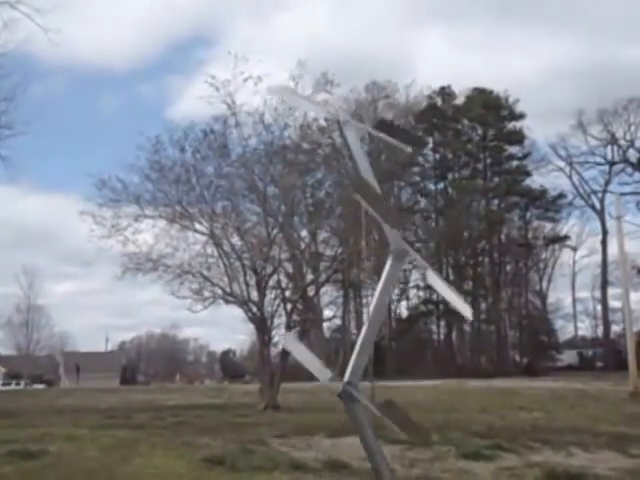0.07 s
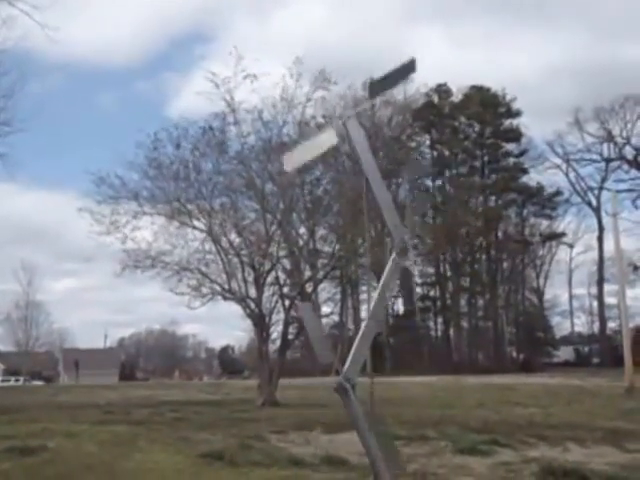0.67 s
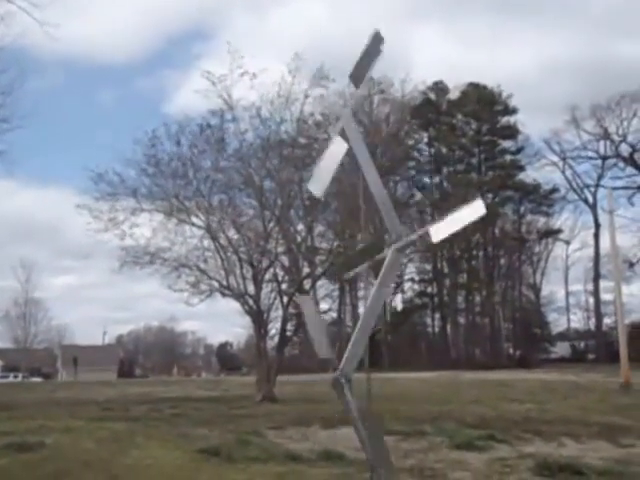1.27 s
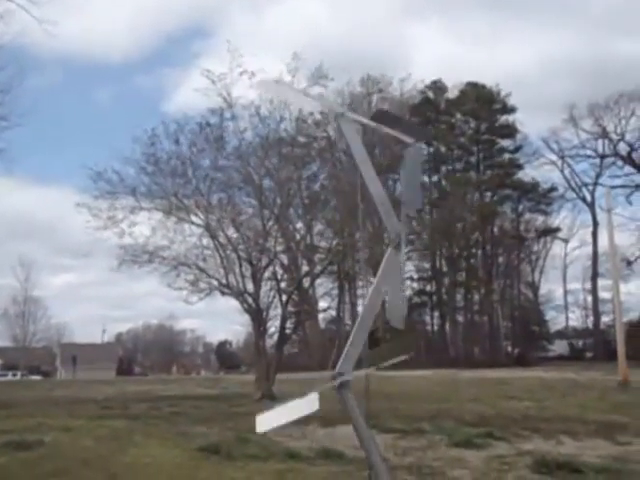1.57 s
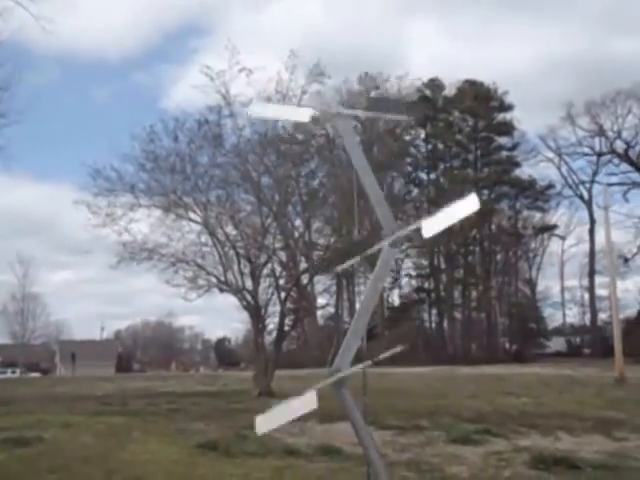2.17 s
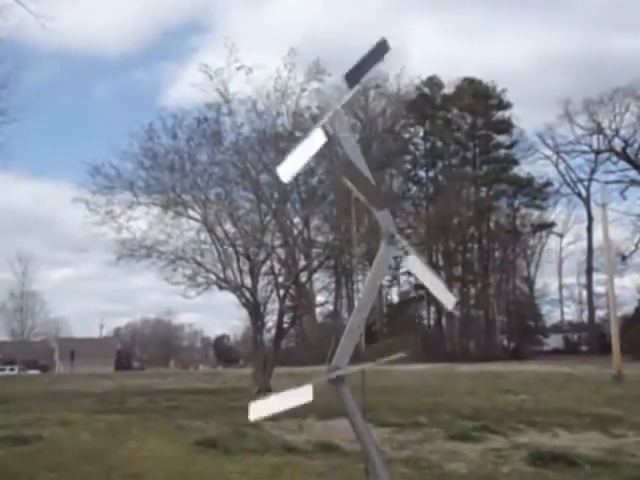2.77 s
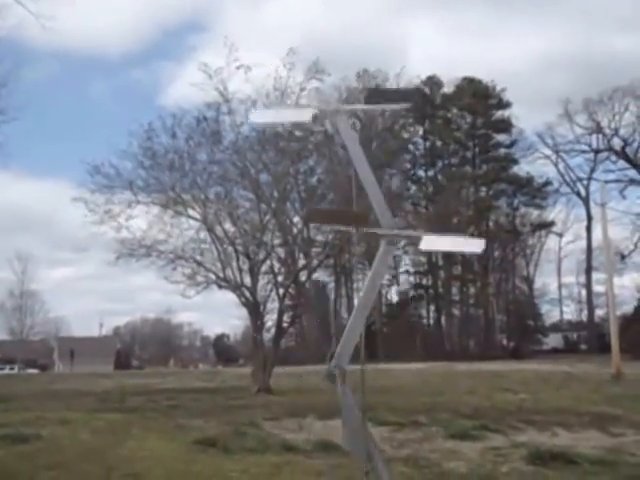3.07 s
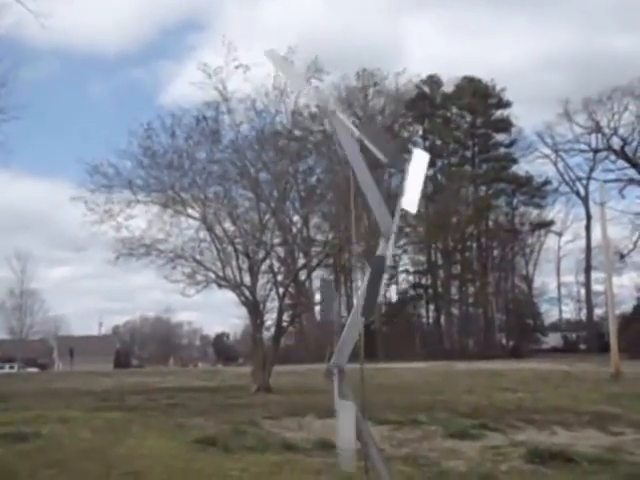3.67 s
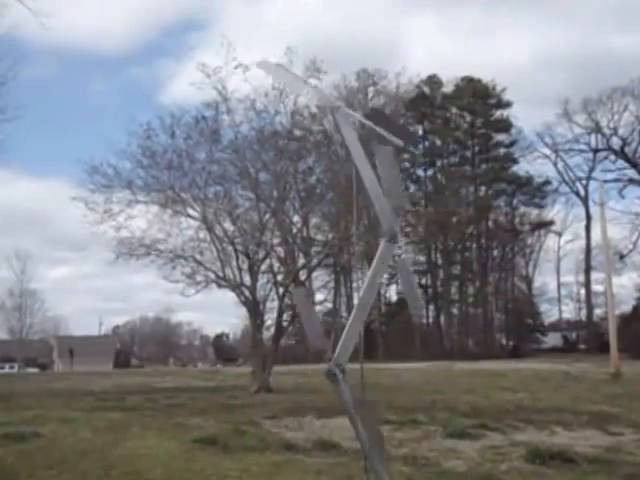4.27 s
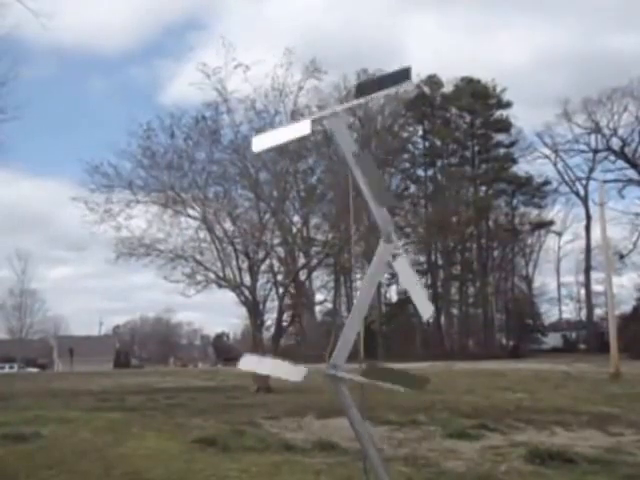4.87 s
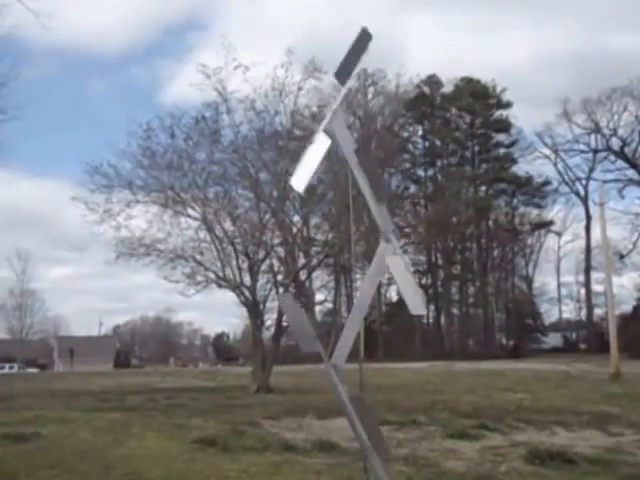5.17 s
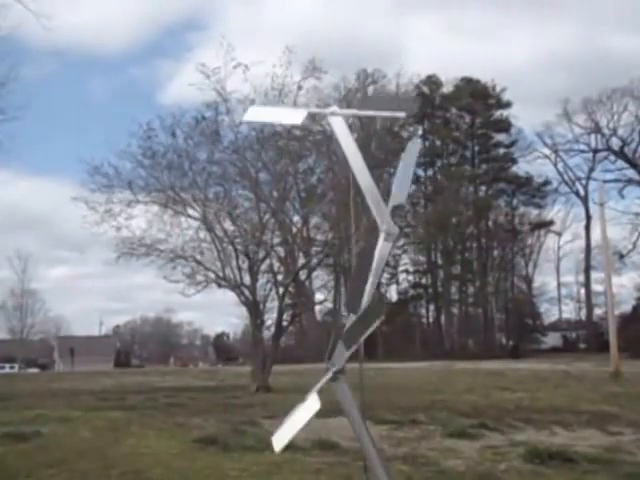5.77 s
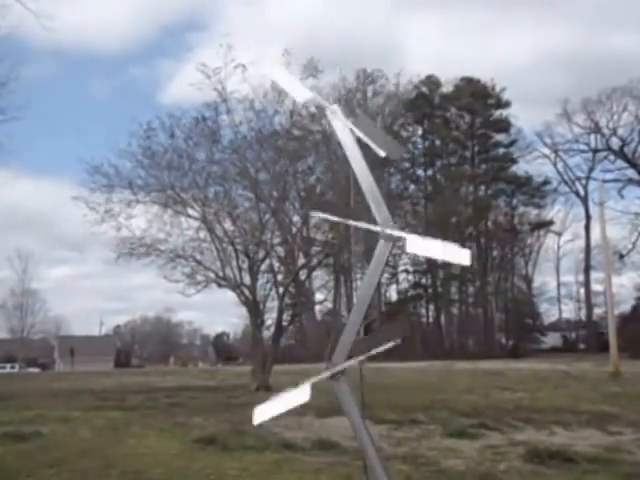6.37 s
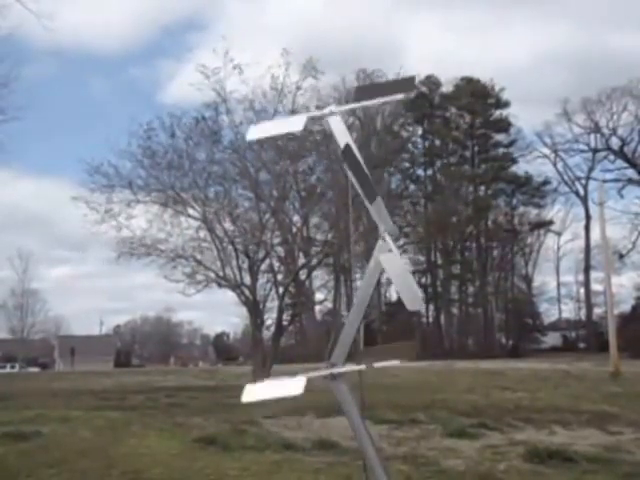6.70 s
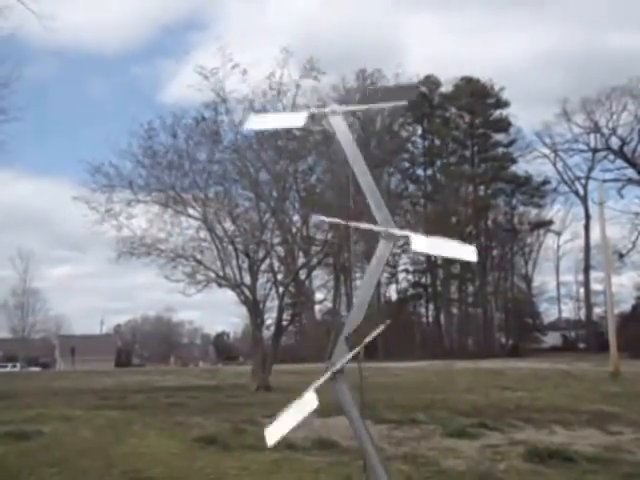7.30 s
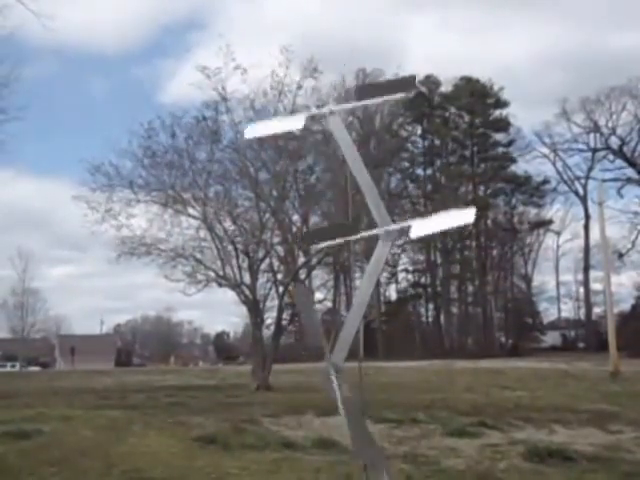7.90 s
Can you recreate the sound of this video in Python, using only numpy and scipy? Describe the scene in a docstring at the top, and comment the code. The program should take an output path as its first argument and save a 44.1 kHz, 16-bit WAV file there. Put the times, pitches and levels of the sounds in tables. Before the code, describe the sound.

A metal wind sculpture rattles, clicks and squeaks as its vanes turn, while gusts rumble on the microphone.

```python
"""A metal kinetic windmill with three vanes turns in a gusty yard, a few metres from a small camera.
With each swing loose balls run and tumble in its dry bearings, knock on the hub, ring the hollow arms
and now and then chatter into short stick-slip squeals. Wind eddies rumble, flutter and thump on the
microphone, over faint air and hum. The camera keeps only a narrow band."""
import sys
import numpy as np
from scipy import signal
from scipy.fft import rfft, irfft, next_fast_len
from scipy.io import wavfile
from scipy.ndimage import uniform_filter1d

SR = 44100
rng = np.random.default_rng(int(sys.argv[2]) if len(sys.argv) > 2 else 0)


def put_to_file(sound):
    """Save the sound as 16-bit audio at rate SR, in the file named by the first command-line argument."""
    columns = np.atleast_2d(sound).T  # one column per channel
    safe = np.clip(columns, -1, 1)
    whole_steps = np.round(safe * 32767)
    wavfile.write(sys.argv[1], SR, whole_steps.astype(np.int16))


N = 350154
T = np.arange(N) / SR

# Levels are relative within each table.
# still air: f/Hz, level/dB
AIR_SPECTRUM = [(30, -10.5), (150, -20.5), (250, -5.5), (500, -5.5), (1000, -7), (5000, -32.5)]
# slow eddies: f/Hz, level/dB
RUMBLE_SPECTRUM = [(10, -3.5), (25, 1.5), (50, -4.5), (80, -9), (120, -17), (200, -33.5), (400, -58)]
# small eddies in a breeze: f/Hz, level/dB
BREEZE_SPECTRUM = [(40, -13), (90, 6.5), (150, 1.5), (250, -8), (400, -30.5), (700, -49)]
# small eddies in a gust: f/Hz, level/dB
GUST_SPECTRUM = [(40, -16), (90, 1), (150, 0), (250, -4.5), (400, -14.5), (700, -23.5), (1500, -52)]
# rumble of the steady wind: t/s, level/dB
STEADY_WIND = [(0, -32), (.7, -31), (1.05, -41.5), (1.25, -33.5), (1.55, -32), (2.1, -45.5), (2.35, -43.5),
               (2.5, -40.5), (2.85, -50.5), (3.2, -39.5), (4.5, -27.5), (4.85, -35.5), (5.7, -27.5),
               (5.97, -39), (6.1, -29.5), (6.7, -32), (7.7, -31), (7.94, -41.5)]
# a brief low bump at the very start, then gusts: t/s, hold/s, rumble/dB, flutter/dB
LOW_SWELLS = [(0, 0.0075, -24, -39), (0.347, 0.019, -26, -37), (0.508, 0.035, -27, -53),
              (0.607, .02, -40, -44), (1.587, 0.028, -25.5, -38), (1.827, 0.018, -33, -37.5),
              (1.91, 0.032, -32, -37), (2.465, 0.12, -36.5, -47), (3.064, 0.017, -30.5, -32.5),
              (3.175, 0.044, -24.5, -34.5), (3.304, 0.094, -23.5, -30.5), (3.568, 0.28, -28, -36.5),
              (3.891, 0.1, -29, -23.5), (4.157, 0.087, -26.5, -24), (4.382, 0.047, -24, -24.5),
              (4.495, 0.089, -30, -33), (5.073, 0.026, -24.5, -46), (5.135, 0.019, -30, -31),
              (5.24, .045, -28, -38.5), (5.53, 0.09, -24, -39.5), (5.647, 0.14, -22.5, -40),
              (5.894, 0.022, -31, -36), (6.091, .025, -30, -38), (6.322, 0.065, -25, -38),
              (6.563, 0.048, -24, -42), (6.684, 0.037, -25, -55), (6.81, 0.019, -32, -40),
              (7.037, .03, -28, -40.5), (7.216, 0.057, -22.5, -41.5), (7.425, 0.069, -26, -39.5),
              (7.569, 0.028, -35, -35), (7.698, .07, -22, -41)]
# vortices hitting the microphone: t/s, half width/s, suction/dB
VORTICES = [(3.256, 0.0018, -16.5), (3.758, 0.0006, -8.5), (3.797, 0.0014, -11.5), (3.835, 0.00075, -8),
            (3.896, 0.0009, -12), (3.926, 0.0007, -19), (4.17, 0.0013, -8.5), (4.216, 0.00068, -24.5),
            (4.41, 0.00079, -19), (4.524, 0.0015, -17), (5.141, 0.00091, -15.5), (5.447, 0.00066, -26),
            (5.67, 0.0008, -4), (5.688, 0.0031, -6.5), (5.814, 0.0011, -17), (6.828, 0.0046, -23),
            (7.218, 0.0035, -11), (7.597, 0.0014, -13), (7.708, 0.00094, -2)]

# bearings turning between runs: t/s, level/dB
BEARING_IDLE = [(0, -37), (.5, -38), (.8, -41), (1.4, -37), (2.1, -39.5), (3.4, -36), (4.15, -41.5),
                (4.6, -39.5), (5.3, -34.5), (5.8, -41.5), (6.3, -35.5), (6.95, -47), (7.15, -47),
                (7.5, -41.5), (7.9, -46)]
# balls speed down a race as a vane swings over, then settle: crest t/s, rise/s, fall/s, level/dB, treble/dB
BALL_RUNS = [(.11, 0.023, 0.054, -35, 16.5), (0.431, 0.08, 0.16, -36, 10), (.66, 0.051, 0.043, -28.5, 5.5),
             (.92, 0.027, 0.053, -25.5, 4.5), (1.149, .025, 0.091, -29.5, 4), (1.41, 0.057, .035, -25.5, 7),
             (1.485, .02, .04, -32.5, 9.5), (1.635, 0.016, 0.026, -24, 7), (1.719, .02, 0.035, -33.5, -3),
             (1.892, 0.022, 0.046, -26.5, 11), (2.08, 0.028, .07, -32.5, -5.5),
             (2.23, .015, 0.059, -32, -2.5), (2.365, .03, .04, -25, 6), (2.735, 0.1, 0.049, -29, 5),
             (2.897, 0.031, 0.022, -23.5, 0), (3.071, 0.014, 0.02, -34.5, -3),
             (3.198, 0.028, .18, -31.5, 6.5), (3.451, 0.064, 0.039, -26, 5.5),
             (3.539, 0.02, .03, -34.5, 12), (3.715, 0.036, .08, -23, 8), (3.97, 0.037, 0.035, -29, 3.5),
             (4.078, 0.024, .02, -28, 4.5), (4.221, 0.011, .025, -34.5, 5), (4.34, 0.058, 0.13, -31, 11.5),
             (4.5, 0.045, .08, -28.5, 2.5), (4.665, .035, 0.031, -24.5, 7.5), (4.8, .025, .035, -29.5, 1.5),
             (4.915, 0.013, .11, -34, 12), (5.15, 0.036, 0.017, -25, 3.5), (5.32, 0.036, 0.044, -31, 6),
             (5.469, 0.055, 0.08, -25.5, 7), (5.661, 0.025, 0.043, -24, 5.5),
             (5.839, 0.018, 0.042, -26.5, 1), (6.037, 0.022, 0.042, -27, 4),
             (6.22, 0.23, 0.061, -33.5, 8.5), (6.48, 0.26, .04, -34.5, 8.5),
             (6.618, .02, 0.066, -38.5, 13.5), (6.845, .08, 0.062, -26.5, 6), (7.06, 0.029, 0.036, -35, 10),
             (7.22, .035, 0.069, -26.5, 6.5), (7.42, 0.052, .03, -33.5, 2), (7.609, 0.069, 0.058, -29, 5)]
# ball contacts: f/Hz, level/dB
CONTACT_SPECTRUM = [(300, -34.5), (550, -23.5), (800, -7), (1000, -8), (1180, -3), (1350, 1.5),
                    (1550, -7.5), (2100, -0.5), (2700, -1.5), (3200, 1.5), (3600, 2.5), (4500, 6),
                    (5000, 3), (5500, -4.5)]
# balls tumbling in a heap: t/s, length/s, level/dB
TUMBLES = [(0.113, 0.028, -28), (0.502, 0.01, -35), (0.903, 0.022, -41), (1.4, 0.014, -26),
           (1.616, 0.022, -29.5), (1.87, 0.028, -27), (2.355, 0.027, -31), (2.906, 0.024, -23.5),
           (4.636, 0.025, -26.5), (4.753, 0.036, -25), (5.071, 0.052, -29.5), (5.278, 0.037, -27),
           (5.387, 0.009, -24.5), (5.421, 0.014, -25.5), (6.845, 0.013, -28)]
# how hard the balls bear on the arms: t/s, level/dB
ARM_LOAD = [(0, -2.5), (2, 3), (4, 0), (5, 3.5), (5.6, 6), (7, 8), (7.9, 8)]
# modes of the hollow arms: f/Hz, width/Hz, level/dB
ARM_MODES = [(744, 16, 1), (862, 16, -5), (1120, 40, 0), (1205, 50, 3), (1606, 30, 3), (1772, 20, 12),
             (1911, 22, 6), (2321, 36, 8), (2638, 30, 1), (2838, 36, 3), (3035, 40, 3), (3362, 46, 6),
             (3445, 44, 4.5), (3975, 50, 0), (5270, 40, 0)]
# square blows on the hub: t/s, level/dB
HUB_CLANGS = [(.916, -22.5), (1.385, -21), (1.632, -30), (1.874, -23), (2.362, -31), (2.92, -29),
              (5.428, -26), (5.625, -25)]
# single balls dropping on the hub: t/s, level/dB
HUB_KNOCKS = [(0.881, -23), (1.329, -24), (1.549, -25.5), (1.62, -23), (1.753, -23), (1.798, -21.5),
              (1.88, -19.5), (1.946, -20.5), (1.994, -22), (2.225, -20), (2.363, -18), (2.735, -17.5),
              (3.361, -20), (3.43, -17), (3.716, -20), (4.649, -18.5), (4.783, -24), (5.318, -20),
              (5.475, -22), (5.838, -21), (6.179, -20), (6.854, -16.5)]
# squeals and low groans of a slipping bearing: t/s, length/s, f/Hz, nominal width/Hz, level/dB
SQUEALS = [(0.073, 0.017, 3920, 390, -17), (0.115, 0.013, 4800, 445, -18), (0.198, 0.035, 3500, 374, -27.5),
           (.326, 0.019, 4880, 524, -18), (0.339, 0.023, 4000, 700, -22.5),
           (0.496, 0.014, 3960, 59.5, -17.5), (0.554, 0.037, 4630, 290, -24),
           (0.617, 0.13, 4520, 200, -31.5), (0.91, 0.011, 3800, 376, -19), (0.956, .007, 3960, 230, -19),
           (1.37, 0.032, 3700, 443, -25), (1.673, 0.0082, 4730, 80, -16.5), (1.868, .006, 3480, 130, -14),
           (2.311, 0.019, 3790, 280, -23), (2.5, 0.064, 2610, 60, -35), (2.714, 0.083, 5070, 300, -29),
           (2.912, 0.0068, 3510, 60, -18.5), (3.116, 0.02, 4580, 300, -23), (3.221, 0.0063, 4040, 60, -13),
           (3.327, 0.058, 3280, 635, -28.5), (3.497, .014, 3650, 80, -21), (3.502, 0.032, 4560, 111, -23),
           (3.611, .024, 3880, 120, -23.5), (4.06, 0.019, 3600, 322, -23), (4.115, 0.024, 3720, 259, -20),
           (4.157, 0.015, 4290, 250, -22), (4.168, 0.051, 3050, 150, -30), (4.227, 0.021, 4000, 59, -21.5),
           (4.324, 0.0084, 3870, 71, -15), (4.286, 0.022, 4900, 337, -27.5), (4.337, .04, 4500, 380, -22.5),
           (4.402, 0.034, 4365, 111, -16.5), (4.506, 0.15, 2835, 70, -28.5),
           (4.56, 0.074, 5310, 250, -31.5), (4.633, 0.02, 3250, 350, -20), (4.751, 0.0078, 3200, 330, -18),
           (4.84, 0.009, 3950, 180, -19.5), (4.884, 0.011, 3510, 600, -13.5),
           (4.899, 0.054, 4000, 160, -16.5), (5.071, .012, 3570, 500, -26), (5.203, 0.047, 4460, 272, -27),
           (5.279, .015, 3390, 150, -22.5), (5.424, .015, 3390, 60, -20.5), (5.502, .016, 3570, 82, -22),
           (5.581, 0.035, 4400, 150, -22.5), (5.62, 0.026, 3400, 119, -18), (5.765, .062, 2880, 182, -31.5),
           (5.843, .057, 737, 70, -41), (6.016, 0.015, 4330, 101, -21.5), (6.166, 0.11, 724, 60, -44),
           (6.404, 0.028, 703, 60, -41.5), (6.759, 0.08, 740, 70, -48), (6.28, 0.083, 4390, 60, -26),
           (6.516, .056, 2866, 80, -26.5), (6.601, 0.11, 2510, 150, -31.5),
           (6.664, 0.052, 5130, 120, -29.5), (6.831, .037, 3700, 350, -22.5), (6.929, 0.03, 4190, 100, -27),
           (7.012, 0.28, 2610, 100, -34), (7.113, 0.044, 5210, 90, -30), (7.228, 0.08, 3670, 356, -22),
           (7.53, .16, 5260, 150, -36), (7.662, 0.16, 2586, 60, -38), (7.773, 0.1, 3060, 60, -34.5),
           (7.916, .018, 3660, 180, -17)]


def undb(db):
    """Decibels to gain."""
    return 10 ** (np.asarray(db) / 20)


def unit(x):
    """Scale to rms 1."""
    return x / np.sqrt(np.mean(x ** 2))


def curve(table):
    """A (t/s, value) table, sample by sample."""
    return np.interp(T, *np.transpose(table))


def colour(x, spectrum):
    """Filter by an (f/Hz, level/dB) spectrum, to rms 1."""
    size = next_fast_len(N)
    bins_hz = np.maximum(np.fft.rfftfreq(size, 1 / SR), 1)
    hz, db = np.transpose(spectrum)
    gain = undb(np.interp(np.log(bins_hz), np.log(hz), db))
    return unit(irfft(rfft(x, size) * gain, size)[:N])


def ring(x, hz, *widths_hz):
    """One resonator per width, in series; gain 1 at the centre."""
    for width_hz in widths_hz:
        x = signal.lfilter(*signal.iirpeak(hz, hz / width_hz, fs=SR), x)
    return x


def drift(rate_hz):
    """Smooth random drift, spread near 1."""
    step = int(SR / rate_hz)
    stairs = np.repeat(rng.standard_normal(N // step + 1), step)
    return 1.2 * uniform_filter1d(stairs, step)[:N]


def clicks(size, per_s, spread_db):
    """Random impacts of uneven strength, rms 1."""
    struck = rng.random(size) < per_s / SR
    strength = undb(spread_db * np.clip(rng.standard_normal(size), -2, 2))
    sign = rng.choice([-1, 1], size)
    return unit(sign * (struck * strength + 1e-9))


def burst(length_s, rise_s, fall_s):
    """Envelope: rise, hold until length_s, decay."""
    t = T[:SR // 2]
    return (1 - np.exp(-t / rise_s)) * np.exp(-np.maximum(t - length_s, 0) / fall_s)


def swells(base_db, rows):
    """Power sum in dB of a base and swells: t/s, hold/s, rise/s, fall/s, level/dB."""
    t, power = T[::64], 0
    for at_s, hold_s, rise_s, fall_s, db in rows:
        before, after = np.maximum(at_s - t, 0), np.maximum(t - at_s - hold_s, 0)
        power += (undb(db) * np.exp(-before / rise_s - after / fall_s)) ** 2
    return 10 * np.log10(undb(base_db) ** 2 + np.interp(T, t, power))


def add(out, at_s, x):
    """Mix x into out."""
    start = max(int(at_s * SR), 0)
    out[start:start + len(x)] += x[:max(N - start, 0)]


def air(level_db=-54.5):
    """Still air over the yard: soft noise."""
    return undb(level_db) * colour(rng.standard_normal(N), AIR_SPECTRUM)


def hum(hz=152, width_hz=22, level_db=-60):
    """A faint hum in the yard: narrow-band noise."""
    return undb(level_db) * unit(ring(rng.standard_normal(N), hz, width_hz, width_hz))


def wind_levels(rise_s=.018, fall_s=.015, flutter_db_per_db=.65):
    """Rumble and flutter in dB: a brief opening bump; both follow the wind and leap with each gust."""
    steady_db, restless = curve(STEADY_WIND), drift(18)
    rumble_db = steady_db + 2 * restless
    flutter_db = -54 + flutter_db_per_db * (steady_db + 30) + 4 * restless
    rumbles = [(at_s, hold_s, rise_s, fall_s, db) for at_s, hold_s, db, _ in LOW_SWELLS]
    flutters = [(at_s, hold_s, rise_s, fall_s, db) for at_s, hold_s, _, db in LOW_SWELLS]
    return swells(rumble_db, rumbles), swells(flutter_db, flutters)


def vortex_thumps(gain_db=-1, skirt_ratio=2.8, lead_s=.05):
    """Suction in the core of a vortex, mild pressure before and behind it."""
    out, t = np.zeros(N), T[:SR // 10] - lead_s
    for at_s, half_width_s, db in VORTICES:
        core = 1 / np.cosh(t / half_width_s) ** 2
        skirt = 1 / np.cosh(t / half_width_s / skirt_ratio) ** 2
        pressure = (skirt / skirt_ratio - core) / (1 - 1 / skirt_ratio)
        add(out, at_s - lead_s, undb(db + gain_db) * pressure)
    return out


def wind(choppy_db=2):
    """Slow eddies rumble, a shower of small ones flutters, a few thump the microphone."""
    rumble_db, flutter_db = wind_levels()
    rumble = colour(rng.standard_normal(N), RUMBLE_SPECTRUM)
    eddies = clicks(N, per_s=350, spread_db=2.3) * undb(choppy_db * drift(70))
    gusty = np.interp(flutter_db, [-46, -29], [0, 1])  # stronger gust: smaller eddies, higher band
    flutter = gusty * colour(eddies, GUST_SPECTRUM) + (1 - gusty) * colour(eddies, BREEZE_SPECTRUM)
    return undb(rumble_db) * rumble + undb(flutter_db) * flutter + vortex_thumps()


def hub_clangs(hz=3378, t60_s=.42):
    """A square blow leaves one thin note hanging in the hub."""
    out, t = np.zeros(N), T[:SR // 2]
    for at_s, db in HUB_CLANGS:
        add(out, at_s, undb(db - 60 * t / t60_s) * np.sin(2 * np.pi * hz * t))
    return out


def hub_knocks(surge_db, hz=1200, width_hz=160, detune=.038, gain_db=-5):
    """Single balls drop on the hub: dull short notes. Weaker ones fall between, louder in a surge."""
    out, t = np.zeros(N), T[:SR // 10]
    age = np.pi * width_hz / 2 * t
    envelope = age * np.exp(1 - age)
    for at_s, db in HUB_KNOCKS:
        note_hz = hz * (1 + detune * rng.standard_normal())
        add(out, at_s - .002, undb(db + gain_db) * envelope * np.sin(2 * np.pi * note_hz * t))
    drops = clicks(N, per_s=150, spread_db=2.5)
    strays = unit(ring(ring(drops, 1192, 250), 1094, 410))
    stray_db = np.interp(T, [3, 4.2], [-45, -50]) + .6 * surge_db
    return out + undb(stray_db) * strays


def faint_slips(per_s=2, mean_s=.04, centre_hz=4000, spread_oct=.3, width_hz=320, level_db=-35):
    """Weak slips of random time, length and pitch, as rows like SQUEALS."""
    draws = rng.random((64, 3))[:int(per_s * N / SR)]
    rows = []
    for slot, (when, span, pitch) in enumerate(draws):
        hz = centre_hz * 2 ** (spread_oct * (2 * pitch - 1))
        rows.append(((slot + when) / per_s, mean_s * (.5 + span), hz, width_hz, level_db))
    return rows


def squeals(gain_db=-1, bite_db=3, bite_s=.0089, stutter_db=1.5, sag=.01):
    """Stick-slip: rapid catches ring one pitch of the race, hardest at first; it wavers and sags."""
    out, t = np.zeros(N), T[:SR // 2]
    size = len(t)
    waver, stutter = drift(90), drift(75)
    for at_s, length_s, hz, width_hz, db in SQUEALS + faint_slips():
        force_db = bite_db * np.exp(-t / bite_s) + stutter_db * np.roll(stutter, rng.integers(N))[:size]
        force = burst(length_s, rise_s=.0007, fall_s=.028) * undb(force_db)
        catches = clicks(2 * size, per_s=1000, spread_db=2.6)
        swing = signal.hilbert(ring(catches, hz, 1.08 * width_hz, 2.7 * width_hz))[size:]
        bounded = swing / (np.abs(swing) + 1e-9) ** .4  # friction limits the swing
        sag_hz = sag * hz * (.5 - np.minimum(t / length_s, 1))
        waver_hz = .22 * width_hz * np.roll(waver, rng.integers(N))[:size]
        bend = np.exp(2j * np.pi * np.cumsum(sag_hz + waver_hz) / SR)
        squeal = force * (bounded * bend).real
        rms = np.sqrt(np.sum(squeal ** 2) / (length_s * SR))
        add(out, at_s, undb(db + gain_db) * squeal / rms)
    return out


def hollow_arms(balls, gain_db=-4):
    """The balls ring the modes of the arms, louder under load."""
    modes = sum(undb(db) * ring(balls, hz, width_hz) for hz, width_hz, db in ARM_MODES)
    return undb(curve(ARM_LOAD) + gain_db) * modes


def tumbles(gain_db=-1):
    """A heap of balls drops at once: a short shower of hard clicks."""
    force = np.zeros(N)
    for at_s, length_s, db in TUMBLES:
        add(force, at_s, undb(db + gain_db) * burst(length_s, rise_s=.001, fall_s=.025))
    hits = clicks(N, per_s=1600, spread_db=8.2)
    return force * unit(ring(hits, 3700, 2000) + .059 * hits)


def free_fall_gain(flight_s=.0074, hush_db=-5):
    """The balls are airborne just before a tumble, so the rolling hushes."""
    lifted = np.zeros(N)
    for at_s, _, _ in TUMBLES:
        add(lifted, at_s - flight_s, np.linspace(0, 1, int(flight_s * SR)) ** .5)
    return undb(hush_db * lifted)


def bearing_levels(uneven_db=1.16, idle_treble_db=6):
    """Rolling level and treble lift in dB: the bearings idle, then surge with each run."""
    idle_db = curve(BEARING_IDLE) + uneven_db * drift(26)
    runs, treble_runs = [], []
    for at_s, rise_s, fall_s, db, lift_db in BALL_RUNS:
        runs.append((at_s, 0, rise_s, fall_s, db))
        treble_runs.append((at_s, 0, rise_s, fall_s, db + lift_db))
    level_db = swells(idle_db, runs)
    return level_db, swells(idle_db + idle_treble_db, treble_runs) - level_db


def rolling(treble_db, flicker_db=1.5):
    """Balls click over pitted races; each patch favours other pitches, most of all in the treble."""
    common = clicks(N, per_s=900, spread_db=1)
    scattered = clicks(N, per_s=400, spread_db=2.6)
    out = np.zeros(N)
    for band, hz in enumerate(np.linspace(500, 5450, 22)):
        hits = .62 * common * (-1) ** band + np.roll(scattered, rng.integers(N))
        treble_share = np.interp(hz, [2300, 3400], [0, 1])
        patch_db = (2 + .5 * treble_share) * drift(30)
        out += ring(hits, hz, 260, 560) * undb(patch_db + treble_share * (treble_db - 8.5))
    return colour(out * undb(flicker_db * drift(70)), CONTACT_SPECTRUM)


def windmill(roll_gain_db=3):
    """Loose balls in dry bearings sound directly and through the arms and hub."""
    level_db, treble_db = bearing_levels()
    balls = rolling(treble_db) * undb(level_db + roll_gain_db) * free_fall_gain() + tumbles()
    surge_db = level_db - level_db.mean()
    return balls + hollow_arms(balls) + hub_clangs() + squeals() + hub_knocks(surge_db)


def scene():
    """The windmill in its gusty yard, mono."""
    return (hum() + windmill() + wind() + air())[None]


def record(dry, band_hz=5440, decimation=4, hiss_db=-47, sheen_db=-39, top_hz=15800):
    """The camera samples at a quarter rate; its short smoothing filter lets the treble mirror upward."""
    band = signal.sosfilt(signal.ellip(8, .3, 60, band_hz, fs=SR, output="sos"), dry[0])
    samples = band * (np.arange(N) % decimation == 0) * decimation
    smoother = signal.firwin(43, SR / decimation / 2, window=("kaiser", 7.5), fs=SR)
    smoothed = signal.fftconvolve(samples, smoother, mode="same")
    hiss = 2 * np.gradient(band) * rng.standard_normal(N)  # follows the rattle
    out = smoothed + undb(hiss_db) * hiss + undb(sheen_db) * ring(hiss, 10280, 680)
    return signal.sosfilt(signal.ellip(10, .2, 70, top_hz, fs=SR, output="sos"), out)[None]


dry = scene()
out = record(dry)
put_to_file(out)
```